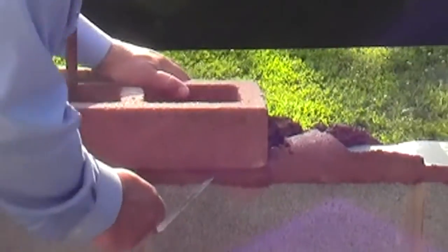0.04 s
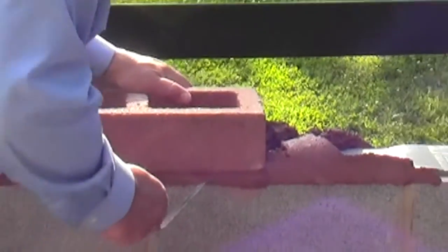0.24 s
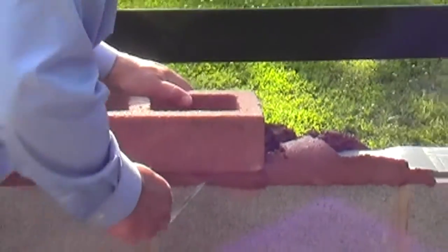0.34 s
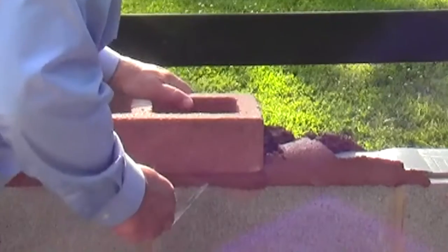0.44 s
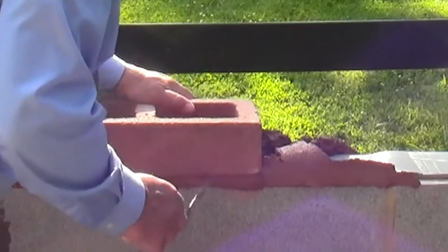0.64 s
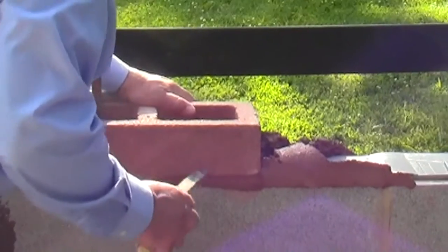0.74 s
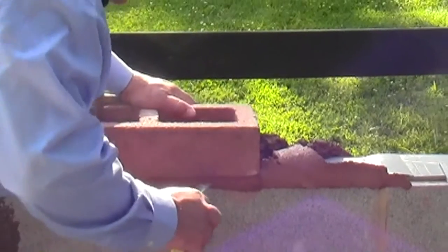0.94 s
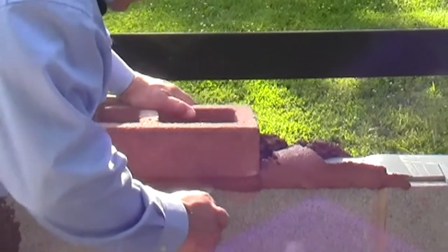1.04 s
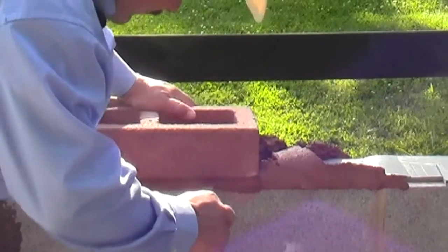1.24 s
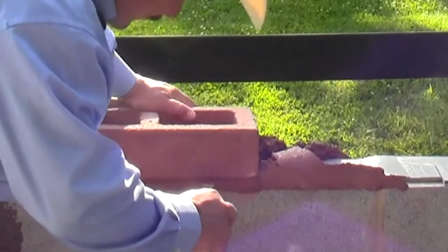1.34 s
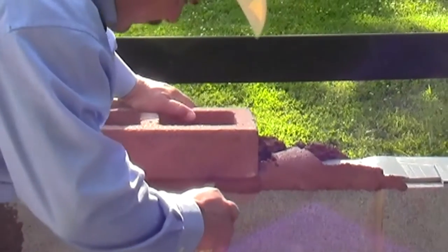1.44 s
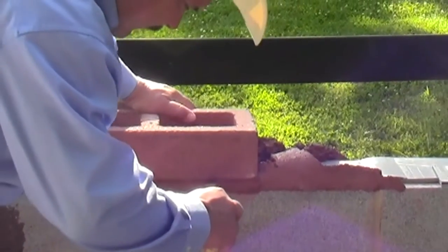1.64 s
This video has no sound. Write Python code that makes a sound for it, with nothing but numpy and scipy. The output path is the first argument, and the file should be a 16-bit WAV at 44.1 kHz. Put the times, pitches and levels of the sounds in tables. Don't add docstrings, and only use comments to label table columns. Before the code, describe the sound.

A steel pointing tool chatters quickly on a hollow masonry block and rings briefly; a gust thumps and crackles on the close outdoor microphone, then faint dull taps and gritty scraping in fresh mortar.

```python
import sys
import numpy as np
from scipy import signal
from scipy.io import wavfile

SR = 44100
rng = np.random.default_rng(int(sys.argv[2]) if len(sys.argv) > 2 else 0)


def voltage_ratio(decibels):
    exponent = np.asarray(decibels, float) / 20
    return 10 ** exponent


def dump(signal):
    limited = np.clip(np.atleast_2d(signal).T, -1, 1)
    pcm = np.round(limited * 32767).astype(np.int16)
    wavfile.write(sys.argv[1], SR, pcm)


N = 74970

# start_s, level_db
GUST_LEVEL = [(0, -38), (.2, -43), (.28, -34.5), (.33, -34.5), (.405, -29.5), (.44, -21.5), (.49, -29.5),
              (.55, -29.5), (.65, -32.5), (.73, -39), (.82, -35.5), (.92, -31.5), (1.0, -33.5), (1.13, -37),
              (1.21, -36), (1.28, -40.5), (1.46, -41), (1.7, -43)]
# pitch_hz, level_db (per Hz)
WIND_COLOUR = [(12, -30), (30, 2), (142, -5), (171, -8.5), (789, -29.5), (933, -36), (1160, -36),
               (1430, -33), (6000, -50.5), (7800, -67), (13200, -120)]


def rms_one(x):
    return x / np.sqrt(np.mean(x ** 2) + 1e-20)


def in_time(rows):
    s, value = np.transpose(rows)
    return np.interp(np.arange(N) / SR, s, value)


def drift(rate_hz):
    r = np.exp(-80 * np.pi * rate_hz / SR)
    slow = signal.lfilter([1], [1, -2 * r, r * r], rng.standard_normal(N // 40 + 2002))
    slow = slow[2000:]
    return np.interp(np.arange(N) / 40, np.arange(len(slow)), rms_one(slow - slow.mean()))


def band_pass(x, low_hz, high_hz, order=2):
    return signal.sosfilt(signal.butter(order, [low_hz, high_hz], "band", fs=SR, output="sos"), x)


def ring(clicks, hz, t60_s):
    r = voltage_ratio(-60 / (t60_s * SR))
    w = 2 * np.pi * hz / SR
    return signal.lfilter([0, np.sin(w)], [1, -2 * r * np.cos(w), r * r], clicks + 1e-18)


def banded(spectrum, lumps_db, rate_hz, tilt_db=0):
    hz, db = np.transpose(spectrum)
    out, together, white = 0, drift(rate_hz), rng.standard_normal((2, N))
    edges = 20 * 2 ** np.arange(0, 9.8, .5)
    for k, (low, high) in enumerate(zip(edges, edges[1:])):
        level = np.interp(np.log(low * high) / 2, np.log(hz), db)
        lumps = lumps_db * (together + .7 * drift(rate_hz))
        out = out + band_pass(white[k % 2], low, high) * voltage_ratio(level + k * tilt_db + lumps)
    return rms_one(out)


def outdoor_air():
    # pitch_hz, level_db
    air_colour = [(88, -49), (150, -10.5), (254, -12), (361, -8.5), (414, -25.5), (716, -15.5),
                  (1240, -17.5), (4860, -24), (16000, -42)]
    level_db, side_db = -45.5, -20.5
    shared = voltage_ratio(level_db) * banded(air_colour, 1.0, 1.5)
    difference = voltage_ratio(side_db + level_db) * banded(air_colour, 0.35, 6.0, -1.3)
    return shared, difference


def wind_rumble():
    gust = in_time(GUST_LEVEL)
    swing_db = gust - gust.mean()
    rumble = voltage_ratio(gust + 0.5) * banded(WIND_COLOUR, 2.08, 57, 0.025 * swing_db)
    heave = rms_one(band_pass(rng.standard_normal(N), 22, 55))
    return rumble + voltage_ratio(-35 + 0.8 * swing_db) * heave


def wind_difference():
    return voltage_ratio(-30 + in_time(GUST_LEVEL)) * banded(WIND_COLOUR, 0.5, 41.0, -0.15)


def wind_pops():
    # start_s, level_db, pitch_hz, direction (sign and size), sharpness of the front (0 to 1)
    swirls = [(0.295, -15.5, 28.95, -1.03, 0.002), (0.323, -16.5, 39.7, 0.86, .1),
              (.413, -13.5, 60, 0.93, 0.086), (0.425, -13.5, 111, 0.97, 0.88), (.440, -12, 69, -0.97, 0.11),
              (0.4456, -6, 128, 0.88, 0), (0.4582, -6, 135, 0.64, 0.63), (0.464, -5, 155, 0.96, 0.48),
              (.473, -7, 55, 0.82, 0.38), (0.485, -11.5, 195, 0.94, 0), (0.504, -7, 117, 0.68, 0.48),
              (.541, -16, 111, -1.25, 0.4), (0.55, -10.5, 123, 0.77, 0.34), (.558, -14, 91, -0.19, 0),
              (.581, -8, 87, 1, 0.55), (0.614, -25, 90.5, -0.47, 0.059), (.64, -16, 169, 0.8, 0.73),
              (0.648, -14.5, 140, 1, 0), (.693, -13.5, 254, -0.83, 0.048), (.703, -17, 61, 1, 0),
              (0.717, -22, 57, 0.92, 0), (0.775, -14.5, 32, -1.04, 0.082), (0.848, -15, 78.4, -0.59, 0.33),
              (0.855, -13, 163, 1, 0.2), (.876, -18.5, 298, -0.78, 0.95), (0.904, -15, 118, 0.6, 0.3),
              (0.919, -23.5, 204, -0.78, 0.74), (.93, -26.5, 58.6, 0.85, 0.18),
              (.952, -23, 260, 0.69, 0.86), (0.958, -23, 82, -0.68, .2), (.978, -22.5, 64, 0.51, .2),
              (1.049, -20, 89, 0.54, 0.071), (1.18, -23, 130, 0.89, 0.48), (1.199, -20.5, 137, 1, 0.21),
              (1.208, -23.5, 163, 1, .2), (1.222, -16.5, 105, 0.69, 0.19), (1.293, -23, 302, -0.46, 0.27),
              (1.418, -26, 149, -1.2, 0.053), (1.4242, -13, 194.4, 0.87, 0.35),
              (1.432, -17.5, 55.7, 0.79, 0.46)]
    cycles, edge_hz = 6.5, 880
    pops = np.zeros(N)
    for s, db, hz, direction, sharp in swirls:
        click = np.zeros(N)
        click[int(s * SR)] = direction * voltage_ratio(db + 0.5)
        swing = ring(click, hz, cycles / hz)
        front = np.gradient(swing) * SR / (2 * np.pi * hz)
        pops += swing + sharp * front
    return signal.lfilter(*signal.butter(1, edge_hz, fs=SR), pops)


def wind_crackle():
    per_s, level_db, cycles = 250, -6.5, 3.65
    sizes = voltage_ratio(4.6 * np.minimum(rng.exponential(1, N), 4)) * rng.choice([-1, 1], N)
    born = (rng.random(N) < per_s / SR) * sizes
    pitches_hz = np.geomspace(180, 1100, 10)
    dealt = rng.integers(0, 10, N)
    rings = 0
    for k, hz in enumerate(pitches_hz):
        rings = rings + ring(born * (dealt == k), hz, cycles / hz) * voltage_ratio(-1.5 * k)
    soft = signal.lfilter([.2], [1, -.8], rings)
    return voltage_ratio(level_db + in_time(GUST_LEVEL)) * rms_one(soft)


def body(modes, column, grit, spread_db, rattle, swap, lean_db=0):
    # start_s, steel_db, face_db, hollow_db, chatter_s
    touches = [(.116, -50, -48, -39, 0.0092), (.1852, -38, -39, -51, 0.0016),
               (.1866, -23, -55, -55, 0.0026), (.1878, -26.5, -26, -23.5, 0.00094),
               (.2052, -17, -32, -50, 0.00038), (.2102, -41, -55, -57, 0.00055),
               (.2152, -41, -46, -45, 0.0016), (.2195, -23, -50, -40, 0.0018),
               (.2229, -11, -24.5, -38, 0.0005), (.2283, -12, -13, -31, 0.0021),
               (.2302, -36, -18, -22.5, 0.0012), (.240, -34, -42, -53, 0.0012),
               (.2432, -23, -16, -28, 0.00075), (.2442, -8, -29, -17.5, 0.00043),
               (.2474, -13.5, -30, -20.5, 0.00064), (.4455, -35, -27, -47, .001),
               (.693, -50, -60, -53, 0.0014), (.8995, -34.5, -59, -67, 0.0011),
               (1.422, -36, -57, -42, 0.0022), (1.524, -31, -40, -38.5, 0.0064),
               (1.6065, -29, -34, -44, 0.0023), (1.611, -32, -46, -38, 0.0047),
               (1.6135, -48, -28.5, -29, 0.0016), (1.622, -37, -47, -29, 0.0016),
               (1.664, -29, -39, -32, 0.0027), (1.669, -27, -40, -50, .002),
               (1.6745, -14.5, -30, -28, 0.002), (1.677, -22, -40, -44, 0.0012),
               (1.6805, -44, -44, -33, 0.0011), (1.686, -24.5, -40, -39, 0.0023),
               (1.697, -24, -25, -47, .002)]
    size = 400
    draws = rng.standard_normal((len(touches), 2 * size + len(modes)))
    chatter = draws[:, :size] * (draws[:, size:2 * size] > .5)
    luck = draws[:, 2 * size:]
    out = 0
    for m, (hz, db, t60_s) in enumerate(modes):
        force = np.zeros(N + size)
        for k, row in enumerate(touches):
            fade = np.exp(-(np.arange(size) / (row[-1] * SR)) ** 2)
            burst = rattle * chatter[k] * fade
            burst[0] = 4.5
            glance = np.clip((row[1] - row[3]) / 24, 0, 1) - .5
            colour_db = spread_db * luck[k, m] + lean_db * glance * np.log2(hz / 6040)
            i = int(row[0] * SR)
            force[i:i + size] += burst / np.sqrt(np.sum(burst ** 2)) * voltage_ratio(row[column] + colour_db)
        out = out + ring(force[:N] + grit, hz, t60_s) * voltage_ratio(db) * swap ** m
    return out


def sand_grit():
    # start_s, level_db
    rub = [
        (.18, -60),
        (.187, -33),
        (.2, -47),
        (.215, -37),
        (.245, -34),
        (.256, -75),
    ]
    # start_s, level_db
    drag = [
        (1.565, -49.5),
        (1.585, -47.5),
        (1.607, -43),
        (1.635, -40),
        (1.665, -35.5),
        (1.68, -36.5),
        (1.7, -29.5),
    ]
    hits = rng.random(N) < 8300 / SR
    grains = rms_one(rng.standard_normal(N) * hits * voltage_ratio(5.1 * drift(45))) / 10
    return grains * (voltage_ratio(in_time(drag)) + voltage_ratio(in_time(rub)))


def steel(grit):
    # pitch_hz, level_db, t60_s
    pressed = [(4330, -13, 0.006), (4820, 2, 0.009), (5100, -18, .004), (5860, -9, 0.005),
               (6570, -10, 0.005), (7390, -5, 0.006), (7900, -6, 0.004), (8500, -7, .004),
               (9060, -9, 0.005), (10700, -16, 0.005), (12000, -26, .005), (12900, -27, .005),
               (14600, -30, .005)]
    # pitch_hz, level_db, t60_s
    bedded = [(2210, -5, 0.0076), (3120, -6, 0.0051), (3656, 0.5, 0.0054), (4730, -6, 0.0066),
              (5970, -5.5, 0.0078), (6560, -7.5, 0.0067), (7770, -0.5, 0.0044), (8670, -8.5, 0.0068),
              (9260, -8.5, 0.0043), (11100, -19, 0.0044), (13200, -12, .005), (15100, -28, .006)]
    on_stone = body(pressed, column=1, grit=grit, spread_db=1.5, rattle=.5, swap=-1, lean_db=19)
    in_mortar = body(bedded, column=1, grit=grit, spread_db=1.5, rattle=1, swap=-1)
    mortar_s = 1.0
    return voltage_ratio(-4.0) * np.where(np.arange(N) / SR < mortar_s, on_stone, in_mortar)


def block_face(grit):
    # pitch_hz, level_db, t60_s
    face_modes = [(1670, -10.5, 0.012), (2026, -3.5, 0.016), (2255, 1, 0.0087), (2410, -3.5, 0.016),
                  (2926, -1, 0.011), (3620, -11.5, 0.0046), (3460, -5, 0.0074)]
    return voltage_ratio(-3.0) * body(face_modes, column=2, grit=grit * voltage_ratio(-3.5), spread_db=1.5, rattle=.4, swap=-1)


def block_hollow(grit):
    # pitch_hz, level_db, t60_s
    hollow_modes = [(490, -3, 0.05), (550, 0, 0.045), (640, -11, 0.02), (770, -13, .02), (935, -4, 0.025),
                    (1100, -9, 0.016)]
    knock = body(hollow_modes, column=3, grit=grit * voltage_ratio(-4), spread_db=1.2, rattle=.15, swap=1)
    no_rumble = signal.butter(2, 330, "high", fs=SR, output="sos")
    return voltage_ratio(-3.0) * signal.sosfilt(no_rumble, knock)


def ground(x):
    level_db, t60_s = -9, .035
    t = np.arange(3000) / SR
    tail = rng.standard_normal(len(t)) * voltage_ratio(-60 * t / t60_s) * (t > .001)
    return x + voltage_ratio(level_db) * signal.fftconvolve(x, tail / np.sqrt(np.sum(tail ** 2)))[:N]


def free_blade():
    # pitch_hz, level_db, t60_s
    free_modes = [(2231, -9.5, .55), (3250, -1, .28), (3365, -13, .1), (4481, -4, .2), (5852, -8, .21),
                  (7403, -9, .09), (9060, -11, .08), (10800, -18, .035), (13200, -21, .025)]
    lift_s, lift_db = .2475, -26
    catch_s, catch_t60_s = 0.365, 0.064
    lift = np.zeros(N)
    lift[int(lift_s * SR)] = voltage_ratio(lift_db)
    free = sum(ring(lift, hz, t60_s) * voltage_ratio(db) for hz, db, t60_s in free_modes)
    return free * voltage_ratio(-60 * np.clip(np.arange(N) / SR - catch_s, 0, 1) / catch_t60_s)


def tool():
    grit = sand_grit()
    haze = voltage_ratio(11) * band_pass(grit, 4460, 14100, order=1)
    contact = steel(grit) + block_face(grit) + block_hollow(grit) + haze
    return ground(contact) + free_blade()


def scene():
    air_shared, air_difference = outdoor_air()
    mid = air_shared + wind_rumble() + wind_pops() + wind_crackle() + tool()
    side = air_difference + wind_difference()
    return np.array([mid + side, mid - side])


def low_pass(x):
    return signal.sosfilt(signal.butter(12, 16460, fs=SR, output="sos"), x)


def record(dry):
    hiss = voltage_ratio(-55.5) * rng.standard_normal(dry.shape)
    top_cut = signal.cheby2(14, 50, 16000, fs=SR, output="sos")
    mix = signal.sosfilt(top_cut, dry + hiss)
    return low_pass(mix)


dry = scene()
out = record(dry)
dump(out)
```